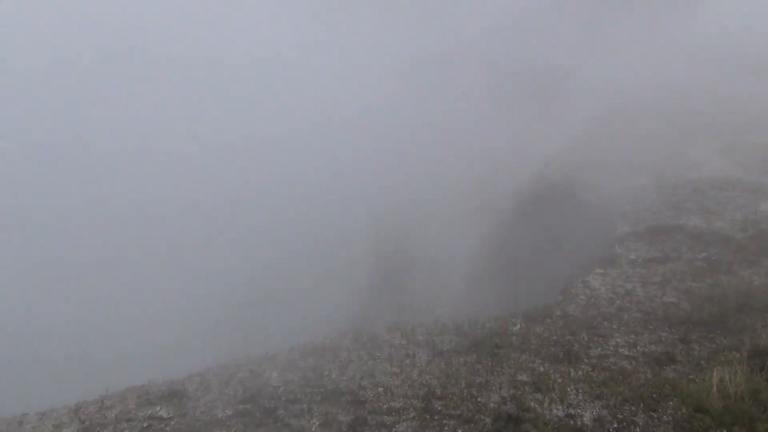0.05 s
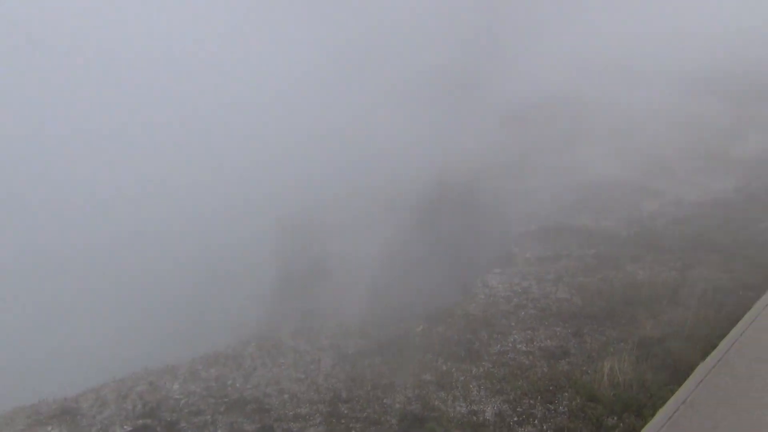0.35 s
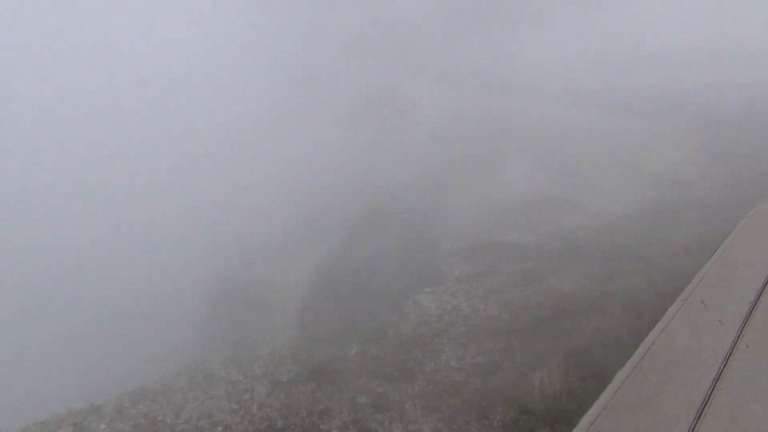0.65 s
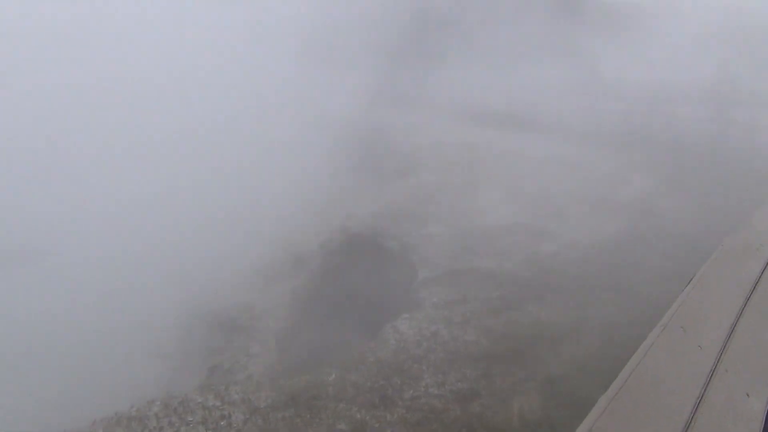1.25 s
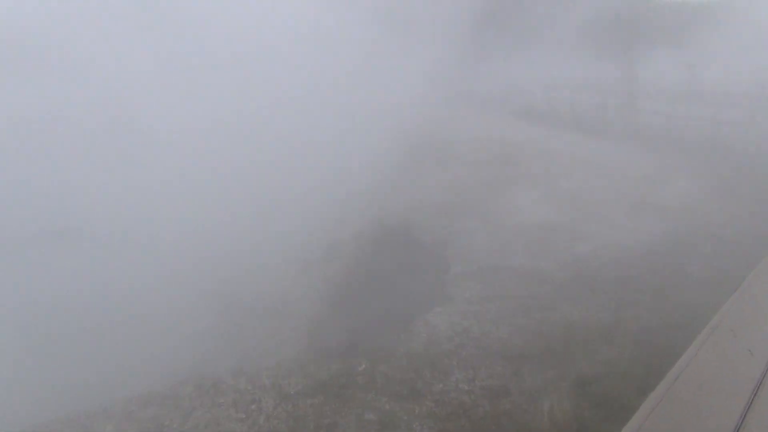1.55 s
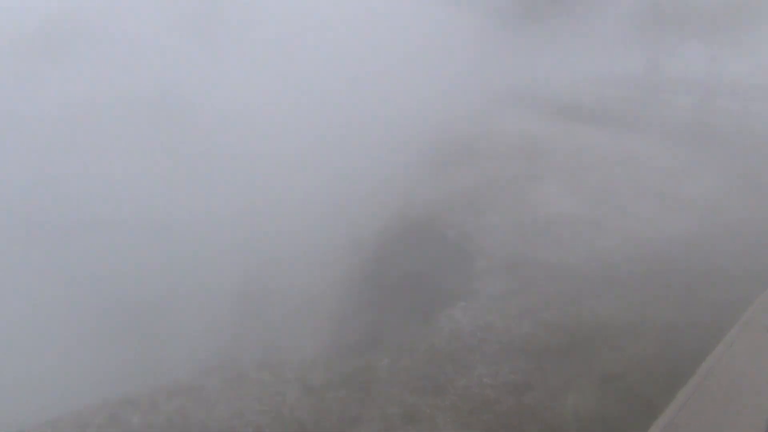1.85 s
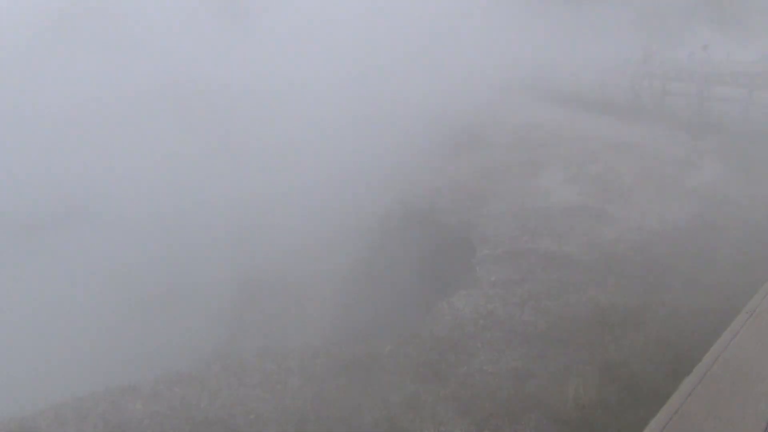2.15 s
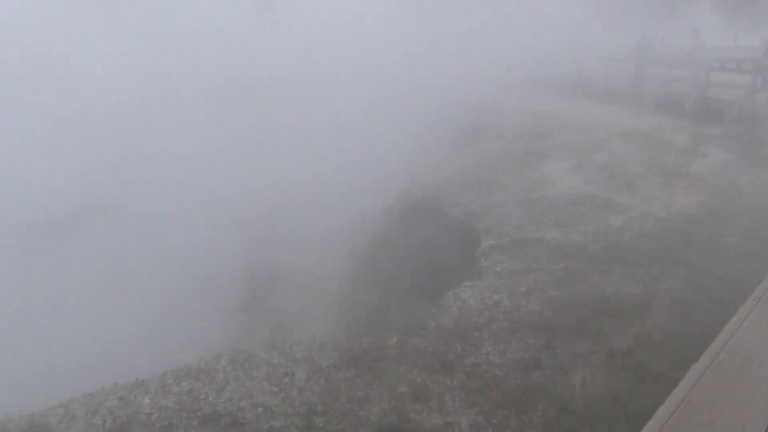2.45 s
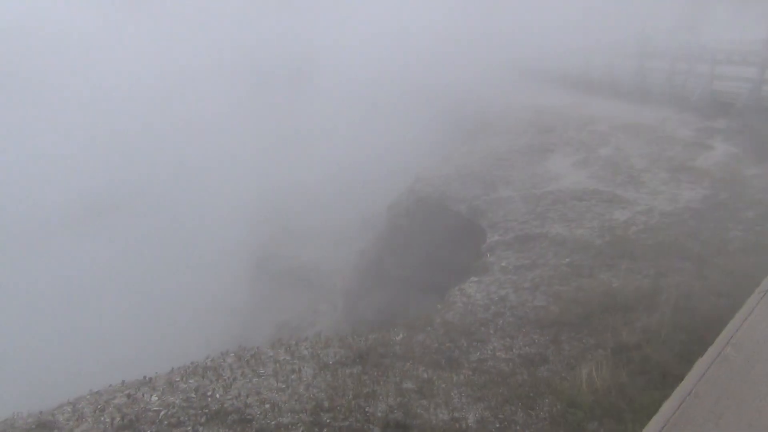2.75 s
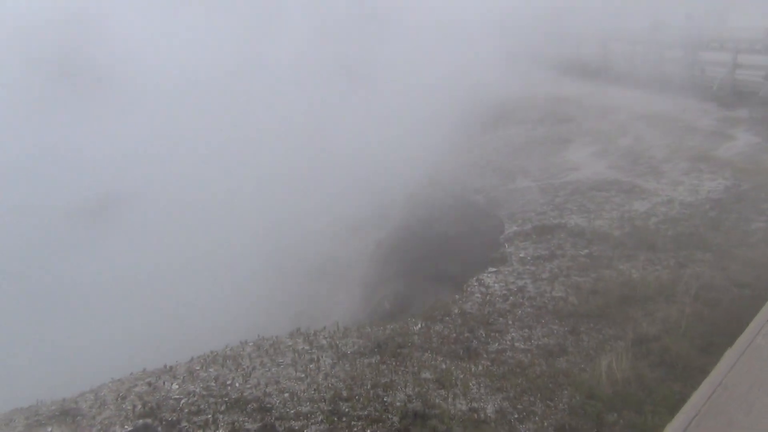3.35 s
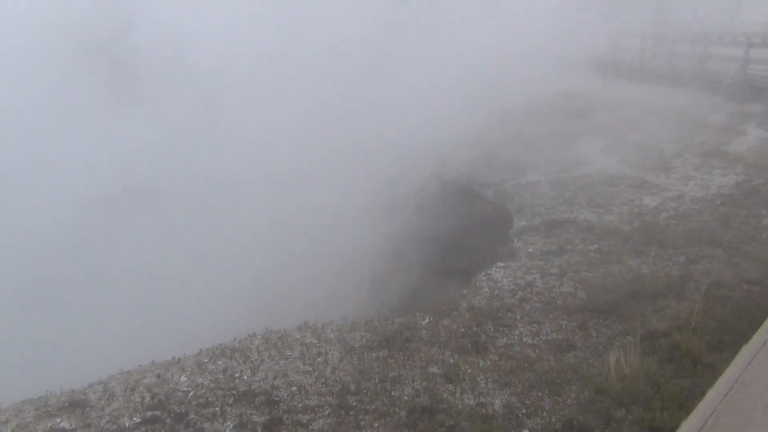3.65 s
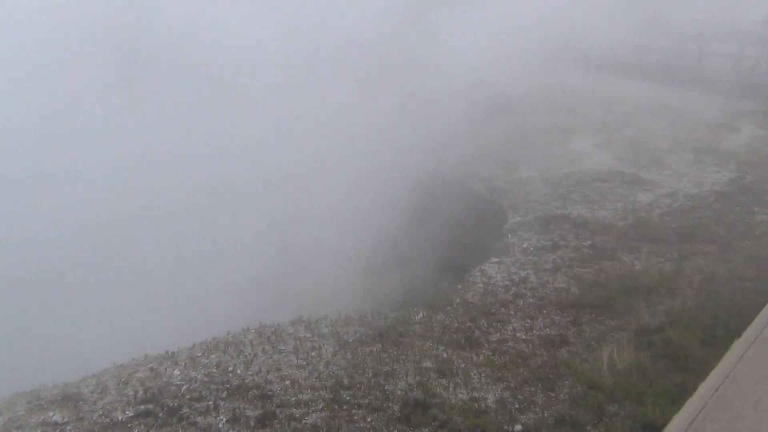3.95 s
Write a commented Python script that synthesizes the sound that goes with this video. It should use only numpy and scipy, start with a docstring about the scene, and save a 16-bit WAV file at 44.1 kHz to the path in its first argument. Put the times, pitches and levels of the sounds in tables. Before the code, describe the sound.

A low, gusty rumble of churning water starts softly and surges raggedly from about 0.6 seconds, dotted with dull thumps, the strongest near 2 seconds. A short snap comes at 2.7. The rumble eases around 3 seconds and swells again near the end. Faint, high cricket chirps repeat about twice a second, with a few gritty ticks, slowly growing soft wind, light hiss and a thin whine.

```python
"""Outdoors by a hot pit, wind and steam rush softly. Ragged surges of low rumble, probably gusts
buffeting the microphone, are made of tiny pressure puffs, with a grainy rasp and short, dull thumps.
Crickets chirp in the grass with quick wing strokes, and grit ticks and scrapes close by.
A small, nearly mono camera adds hiss and a thin whine."""
import sys
import numpy as np
from scipy.fft import rfft, irfft, next_fast_len
from scipy.io import wavfile
from scipy.ndimage import uniform_filter1d, map_coordinates

SR = 44100
rng = np.random.default_rng(int(sys.argv[2]) if len(sys.argv) > 2 else 0)


def inscribe(sig):
    """Save sig as 16-bit PCM at rate SR to the path in sys.argv[1].

    A 1-D sig is mono; a 2-D sig holds one channel per row.
    Samples are clipped to [-1, 1] before scaling.
    """
    pcm = np.round(np.clip(np.atleast_2d(sig).T, -1, 1) * 32767)
    wavfile.write(sys.argv[1], SR, pcm.astype(np.int16))


N = 176400  # 4 seconds

# The tone of the wind (frequency [Hz], relative level [dB])
WIND_TONE = [(20, -25), (50, -2), (130, 5.5), (300, 1), (500, -4.5), (800, -2), (1200, -7), (2000, -18),
             (3500, -30), (8000, -32)]
# How the wind slowly grows (time [s], level [dB])
WIND_RISE = [(0, -58.5), (.38, -58.5), (1.6, -55), (3.1, -52), (4, -51)]
# Chirps of the nearby cricket (time [s], level [dB])
NEAR_CHIRPS = [(0.044, -58), (.506, -53.5), (0.93, -55), (1.343, -50), (1.776, -52), (2.172, -51),
               (2.622, -55), (2.87, -65.5), (3.12, -63.5), (3.951, -61)]
# Surges of rumble, probably gusts (time [s], length [s], body level [dB], rasp level [dB])
GUST_SURGES = [(0.222, 0.068, -47, -59.5), (0.415, 0.082, -49.5, -64.5), (0.511, 0.085, -51.5, -67.5),
               (0.607, 0.075, -42.5, -62), (.664, 0.011, -34, -45.5), (0.69, 0.084, -42, -64.5),
               (0.778, 0.054, -46.5, -61), (0.866, 0.027, -34.5, -52.5), (0.906, 0.014, -28, -44),
               (0.94, 0.05, -37.5, -61), (0.997, 0.031, -45.5, -72), (1.036, 0.025, -34, -58),
               (1.077, 0.12, -42, -60.5), (1.195, 0.083, -35, -56.5), (1.274, 0.018, -31.5, -54),
               (1.296, 0.022, -29, -43.5), (1.323, 0.024, -42, -45), (1.353, 0.019, -32.5, -46.5),
               (1.374, 0.042, -30, -42), (1.41, 0.03, -31.5, -53.5), (1.442, 0.045, -38, -56),
               (1.474, 0.12, -48.5, -68), (1.627, 0.16, -48.5, -83), (1.772, 0.058, -41, -60),
               (1.802, 0.064, -35, -48), (1.86, 0.042, -42.5, -79), (1.948, 0.0067, -27.5, -51),
               (1.965, 0.037, -42.5, -58), (1.993, 0.036, -28, -45), (2.027, 0.049, -28, -42.5),
               (2.078, 0.046, -41.5, -60), (2.134, 0.044, -34.5, -52), (2.204, 0.07, -44, -64.5),
               (2.295, 0.014, -28.5, -44), (2.372, 0.009, -27, -48), (2.389, 0.014, -27.5, -42.5),
               (2.411, 0.0068, -30, -65), (2.447, 0.031, -38, -56.5), (2.499, 0.147, -34.5, -55),
               (2.656, 0.044, -28.5, -51), (2.731, 0.09, -33.5, -52), (2.842, 0.055, -37.5, -60),
               (2.902, 0.045, -36.5, -53.5), (3.173, 0.06, -50, -68), (3.229, 0.021, -34.5, -52.5),
               (3.265, 0.022, -37, -65), (3.301, 0.033, -34.5, -51), (3.337, 0.016, -41, -66),
               (3.384, 0.077, -54, -66), (3.479, 0.0055, -36.5, -55), (3.718, 0.094, -40.5, -62.5),
               (3.823, 0.062, -32, -50.5), (3.89, 0.028, -36.5, -57), (3.929, 0.045, -35, -53.5),
               (3.98, .05, -24.5, -45.5)]
# The tone of the body, the main part of the rumble (frequency [Hz], relative level [dB])
BODY_TONE = [(60, -69), (140, -22.5), (230, -3.5), (350, 3.5), (480, -1), (650, -4.5), (820, -12.5),
             (1100, -20.5), (1600, -30), (5000, -86)]
# The tone of the bass beneath it (frequency [Hz], relative level [dB])
BASS_TONE = [(20, -48), (45, -23), (75, -13.5), (100, -7.5), (135, -3), (190, -2.5), (260, -3), (450, -31),
             (1000, -88)]
# The tone of the brighter, grainy rasp of each surge (frequency [Hz], relative level [dB])
RASP_TONE = [(400, -31), (800, 2.5), (1200, 3.5), (2000, -4), (3000, -12.5), (4100, -19.5), (5200, -32),
             (12000, -65)]
# The bass follows the body, but barely grows in loud surges (body level [dB], bass level [dB])
BASS_FOR_BODY = [(-79, -92), (-53, -56), (-41, -41), (-26.5, -38)]
# Close ticks and one snap (time [s], level [dB], centre frequency [Hz], width [octaves])
GRIT_TICKS = [(0.415, -46, 4180, 0.43), (.438, -51, 8300, .3), (1.623, -52.5, 6900, 0.35),
              (2.213, -46.5, 6200, 0.35), (2.662, -30.5, 736, 1.26), (3.506, -53, 12100, .05),
              (3.241, -52.5, 3000, 0.87), (3.703, -45, 5400, 0.37), (3.864, -50, 2800, 0.92),
              (3.969, -46, 3000, 0.76)]
# The tone of scraping grit (frequency [Hz], relative level [dB])
GRIT_TONE = [(1500, -3), (3500, 2), (7000, -2), (11000, -13), (14000, -25)]
# Short, dull thumps within the rumble (time [s], level [dB], pitch [Hz])
THUMPS = [(.666, -26, 704), (.720, -26.5, 395), (0.905, -16.5, 400), (0.942, -23, 217), (.953, -25, 292),
          (0.97, -26.5, 170), (1.036, -24.5, 155), (1.039, -24, 420), (1.2066, -18, 398),
          (1.2718, -19, 432), (1.581, -27, 350), (1.636, -30.5, 220), (1.952, -21.5, 373), (2, -20, 306),
          (2.010, -12.5, 460), (2.154, -18.5, 380), (2.296, -18, 348), (2.373, -22, 212), (2.389, -20, 294),
          (2.452, -23, 460), (2.504, -22, 577), (2.692, -29, 375), (2.8, -19.5, 377), (3.168, -33, 236),
          (3.238, -26, 286), (3.484, -26.5, 356), (3.821, -23, 293), (3.848, -24, 380)]
# The rumble's slight left-right balance at each frequency (frequency [Hz], left minus right [dB])
RUMBLE_BALANCE = [(60, 6), (130, 0.5), (205, -4.5), (300, 3), (450, -3.5), (740, 4), (1500, 1)]
# The tone of the hiss both ears share (frequency [Hz], relative level [dB])
HISS_MID_TONE = [(2000, 6), (4500, 3), (7500, 3.5), (10000, 0), (16000, -1)]
# The tone of the hiss that adds a little width (frequency [Hz], relative level [dB])
HISS_SIDE_TONE = [(5000, -6), (9000, 8), (12000, -15)]


def amp(db):
    """Turn decibels into a number to multiply a sound by."""
    return 10 ** (np.asarray(db) / 20)


def unit(x):
    """Scale a signal so its average strength (rms) is 1."""
    return x / np.sqrt(np.mean(x ** 2) + 1e-20)


def clock():
    """The time in seconds at each sample."""
    return np.arange(N) / SR


def wobble(rate):
    """A smooth curve through `rate` random values a second."""
    return map_coordinates(rng.standard_normal(2048), [clock() * rate], mode="wrap")


def filtered(x, gain_at):
    """Turn each frequency up or down by gain_at(hz)."""
    size = next_fast_len(N + SR // 4)
    return irfft(rfft(x, size) * gain_at(np.fft.rfftfreq(size, 1 / SR)), size)[..., :N]


def db_at(hz, table):
    """Look up decibels between the rows of a frequency table."""
    frequencies, db = np.transpose(table)
    return np.interp(np.log(hz + 1), np.log(frequencies), db)


def coloured(x, tone):
    """Give a signal the chosen tone, at strength 1."""
    return unit(filtered(x, lambda hz: amp(db_at(hz, tone))))


def noise(tone):
    """A smooth, steady rush with the chosen tone."""
    return coloured(rng.standard_normal(N), tone)


def stereo(mid, side):
    """Make left and right: both share mid, and side adds width."""
    return np.array([mid + side, mid - side])


def wind():
    """Wind and steam rush softly, wavering as they grow."""
    level = amp(np.interp(clock(), *np.transpose(WIND_RISE)) + 2.1 * wobble(rate=14))
    return level * stereo(noise(WIND_TONE), amp(-16) * noise(WIND_TONE))


def chirp(start, hz, length_s=.102, strokes_per_s=97, fall_hz=222):
    """A cricket rubs its wings in a swelling run of strokes, each falling in pitch."""
    t = clock() - start
    live = (t > 0) & (t < length_s)
    t = t[live]
    strokes = t * strokes_per_s
    progress = np.minimum(strokes % 1 / 0.78, 1)  # sound for 78% of each stroke, then a rest
    pitch_scatter, scatter_db = rng.standard_normal((2, 64))[:, strokes.astype(int)]
    pitch = hz + fall_hz * (.5 - progress) + 35 * pitch_scatter
    swell = np.abs(np.sin(np.pi * (t / length_s) ** 1.4)) ** 0.5
    pulses = amp(scatter_db) * np.abs(np.sin(np.pi * progress)) ** 0.56
    out = np.zeros(N)
    out[live] = swell * pulses * np.sin(2 * np.pi * np.cumsum(pitch) / SR)
    return out


def crickets(near_hz=8553, far_hz=8140, far_db=-66.5, far_every_s=0.37):
    """One cricket chirps close by, a little to the right, and a faint, uneven one farther off."""
    near = sum(amp(db) * chirp(start, near_hz) for start, db in NEAR_CHIRPS)
    far = sum(amp(far_db + rng.normal(0, 2)) * chirp(start, far_hz + rng.normal(0, 82))
              for start in far_every_s * (np.arange(10) + .78))
    return near * amp([[-1], [1]]) + far


def surge(start, length, rise_s=.004, fade_s=.007):
    """A loudness curve that rises quickly, holds and dies away."""
    t = clock() - start
    return np.clip(t / rise_s + .5, 0, 1) * np.exp(-np.maximum(t - length, 0) / fade_s)


def puffs(tone, rate):
    """Tiny pressure puffs at random moments, about `rate` a second."""
    kicks = (rng.random(N) < rate / SR) * rng.choice([-1, 1], N)
    return coloured(kicks, tone)


def buffeting(swirl_db=-14, swirl_s=0.11):
    """Surges of fluttering puffs, probably gusts hitting the microphone: body, bass and rasp."""
    body_power = sum((amp(db) * surge(start, length)) ** 2 for start, length, db, _ in GUST_SURGES)
    rasp_power = sum((amp(db) * surge(start, length, rise_s=.002, fade_s=.004)) ** 2
                     for start, length, _, db in GUST_SURGES)
    # A quieter swirl lingers around every surge.
    window = int(swirl_s * SR)
    swirl_power = np.abs(uniform_filter1d(body_power, window, origin=window // 4))
    body_level = np.sqrt(body_power + amp(swirl_db) ** 2 * swirl_power)
    body_db = 20 * np.log10(body_level + 1e-9)
    bass_level = amp(np.interp(body_db, *np.transpose(BASS_FOR_BODY)))
    clumps = unit(amp(3 * wobble(rate=600)))
    flutter = unit(amp(1.4 * wobble(rate=79.8)))
    body = body_level * puffs(BODY_TONE, rate=2600)
    bass = bass_level * puffs(BASS_TONE, rate=700)
    rasp = np.sqrt(rasp_power) * clumps * puffs(RASP_TONE, rate=1800)
    return flutter * (body + bass + rasp)


def ticks(rise_s=0.0001, fade_s=.016):
    """Grit close by makes bright ticks and one snap, each a tiny burst of noise."""
    out = np.zeros((2, N + SR))
    t = np.arange(4096) / SR
    hz = np.fft.rfftfreq(len(t), 1 / SR) + 1
    for start, db, centre, width in GRIT_TICKS:
        band = np.exp(-.5 * (np.log2(hz / centre) / width) ** 2)
        burst = unit(irfft(rfft(rng.standard_normal((2, len(t)))) * band))
        level = amp(db - 60 * t / fade_s) * (1 - np.exp(-t / rise_s))
        mid, side = level * burst
        first = round(start * SR)
        out[:, first:first + len(t)] += stereo(mid, 0.085 * side)
    return out[:, :N]


def scrape():
    """Loose grit crunches briefly."""
    return amp(-60) * surge(start=.416, length=0.03) * puffs(GRIT_TONE, rate=1200)


def thumps(cycles_to_peak=0.56):
    """Short, dull thumps within the rumble, each just two or three swings of pressure."""
    out = np.zeros(N)
    for start, db, hz in THUMPS:
        cycles = np.maximum(clock() - start, 0) * hz
        age = np.minimum(cycles / cycles_to_peak, 20)
        swell = (age * np.exp(1 - age)) ** 2
        out += amp(db) * swell * np.sin(2 * np.pi * cycles)
    return out


def rumble():
    """Buffeting and thumps together, nearly mono, each frequency a little to the left or right."""
    sound = buffeting() + thumps()
    return filtered(sound, lambda hz: amp(stereo(0, db_at(hz, RUMBLE_BALANCE) / 2)))


def scene():
    """The rumble, with the grit, crickets and soft wind."""
    return rumble() + ticks() + scrape() + crickets() + wind()


def record(dry, low_cut_hz=58.5, top_hz=16500, whine_hz=15734.3, buzz_hz=60):
    """The camera cuts the deep bass, adds hiss and a buzzing whine, and drops the highest treble."""
    t = clock()
    sound = filtered(dry, lambda hz: (1j * hz / (1j * hz + low_cut_hz)) ** 2)
    hiss = amp(-66.5) * stereo(noise(HISS_MID_TONE), amp(-14.5) * noise(HISS_SIDE_TONE))
    dips = unit(np.exp(-((t * buzz_hz % 1 - .5) / 0.055) ** 2))
    buzz = 1 - amp(-11) * dips  # quick, regular dips in level make the whine buzz
    whine = amp(-65.5) * np.sqrt(2) * buzz * np.sin(2 * np.pi * whine_hz * t)
    return filtered(sound + hiss + whine, lambda hz: hz < top_hz)


dry = scene()
out = record(dry)
inscribe(out)
```